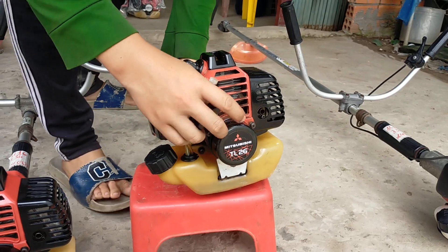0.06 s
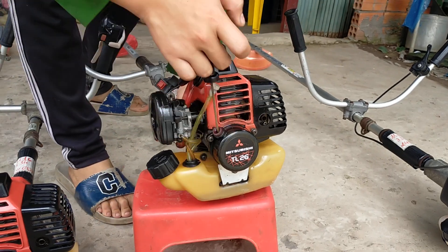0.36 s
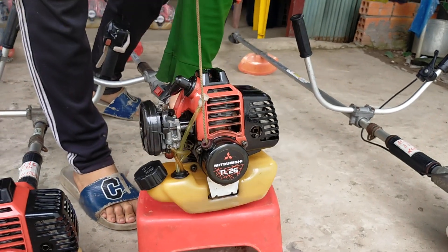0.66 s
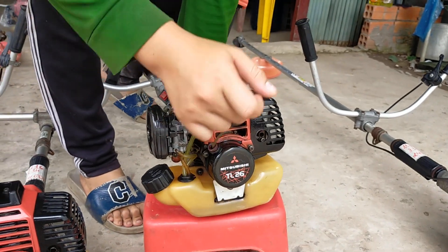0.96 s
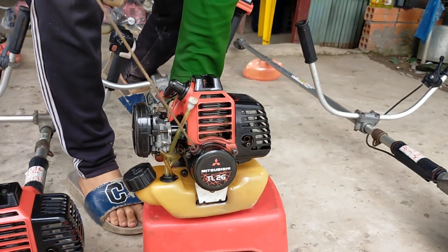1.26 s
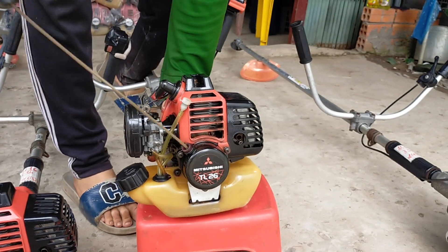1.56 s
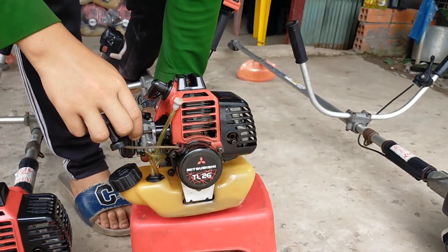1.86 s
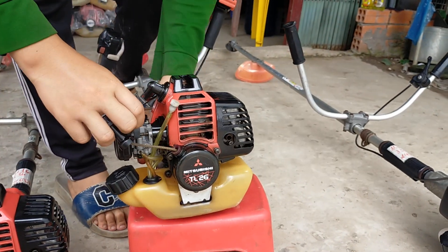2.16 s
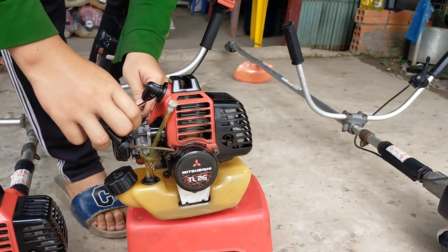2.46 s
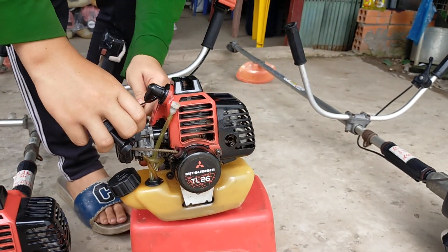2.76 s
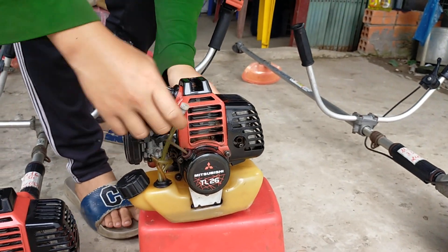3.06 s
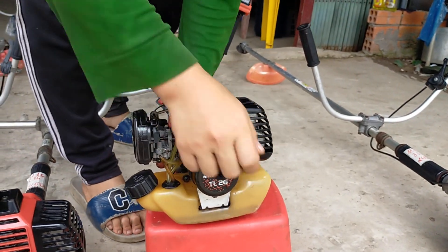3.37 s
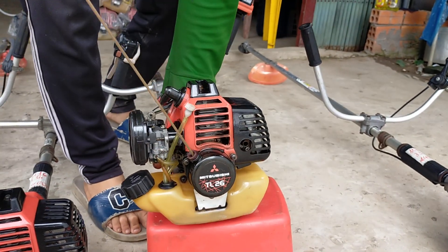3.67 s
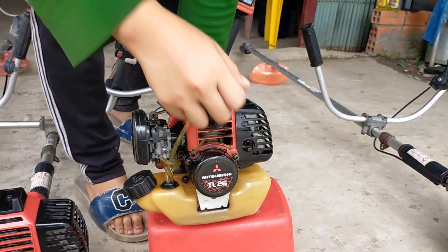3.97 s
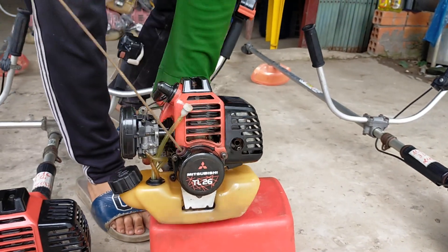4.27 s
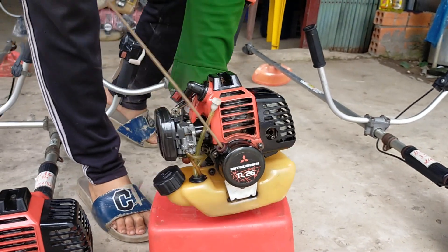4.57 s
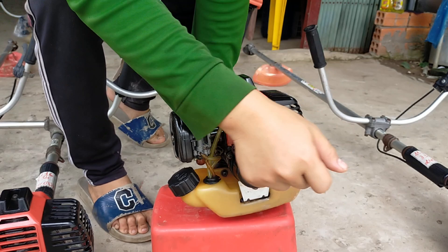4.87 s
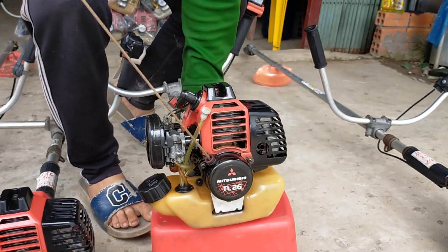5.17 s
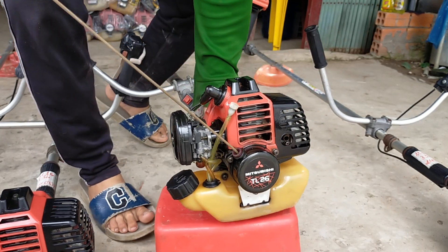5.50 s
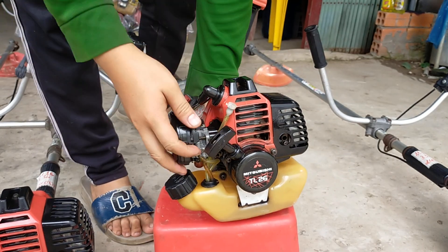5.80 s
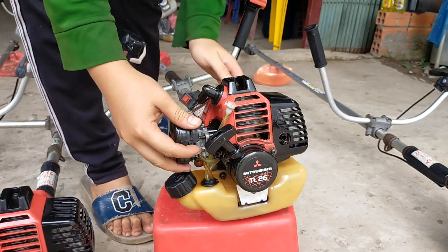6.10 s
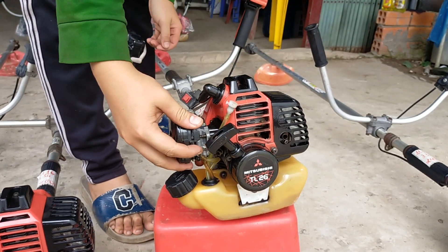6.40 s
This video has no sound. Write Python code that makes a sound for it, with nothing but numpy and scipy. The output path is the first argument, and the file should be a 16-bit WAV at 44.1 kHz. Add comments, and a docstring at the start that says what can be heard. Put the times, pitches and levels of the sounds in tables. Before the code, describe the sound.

In a yard, close to the microphone, a small two-stroke engine is cranked by repeated pulls of a hissing cord. Hollow chuffs alternate with ratcheting steel clinks, plastic clicks and light sleeve rustles, and a dull bump comes midway. On the last pull the engine fires and runs in a rough, clattering idle, with a short echo off the walls and a faint machine hum far away.

```python
"""A small two-stroke brush cutter, pull-started on a stool in a concrete yard, close to the microphone.
Its plastic parts click as it is handled. Each pull of the cord makes the piston churn and chuff,
and the pawl clinks over the steel starter cup as the cord winds back. On the last pull the engine
catches and idles unevenly: an exhaust pulse rings the muffler every turn, but only some turns fire hard.
Behind it lie a short echo off the shed walls, a soft outdoor wash and the hum of a far machine."""
import sys
import numpy as np
from scipy import signal
from scipy.fft import rfft, irfft
from scipy.io import wavfile

SR = 44100
rng = np.random.default_rng(int(sys.argv[2]) if len(sys.argv) > 2 else 0)


def put_to_file(sound):
    """Save the sound as 16-bit audio at rate SR, in the file named by the first command-line argument."""
    columns = np.atleast_2d(sound).T  # one column per channel
    safe = np.clip(columns, -1, 1)
    whole_steps = np.round(safe * 32767)
    wavfile.write(sys.argv[1], SR, whole_steps.astype(np.int16))


N = 284004
TIME = np.arange(N) / SR
CATCH_S = 5.17  # the engine comes to life

# The tone of each sound at the microphone. Each row: frequency in Hz, relative level in dB.
YARD_SPECTRUM = [(20, -3), (120, -8), (165, -12.5), (210, -14), (420, -18), (680, -12), (1300, -11),
                 (1800, -10.5), (2250, -17.5), (2800, -23.5), (6000, -29), (7800, -23), (9500, -33.5),
                 (15500, -31.5)]  # distant outdoor wash
SWISH_SPECTRUM = [(700, -8.5), (1500, 9), (2300, 9), (3200, -1), (5000, -14), (9000, -32)]  # sleeves and hands
SNAP_SPECTRUM = [(1200, -34), (2500, 4), (3600, 4.5), (5500, 0.5), (7700, 10.5), (9500, -4), (11500, 7),
                 (15500, -2.5)]  # plastic snapping
BODY_SPECTRUM = [(200, -37), (550, -16.5), (870, 1), (1020, 0.5), (1260, 5.5), (1650, -5), (1950, -5),
                 (2500, -12.5), (4000, -20)]  # the machine's hollow body
STRIKE_SPECTRUM = [(1500, -38), (2500, -15.5), (3200, 5.5), (4600, 5.5), (5500, 3.5), (7700, 10),
                   (9800, -2), (11000, 8.5), (12500, -2.5), (15500, 8)]  # pawl on steel
CORD_SPECTRUM = [(1200, -29), (2200, -5), (2700, 0.5), (3300, 1.5), (4800, 2), (6000, -3), (7800, 4.5),
                 (9500, -5.5), (11000, -2.5), (13000, -6), (15500, -2.5)]  # cord sliding out
CHURN_SPECTRUM = [(40, -7), (90, 10), (170, 3.5), (260, 4), (400, -3), (520, -1), (640, 3), (880, -4),
                  (1250, 4), (1650, -7.5), (1980, 1.5), (2600, -48), (4000, -18), (6600, -60)]  # air churned by the piston
PIPE_SPECTRUM = [(25, -32), (52, -6), (105, 3.5), (155, 4), (208, 0), (270, -1), (340, -8), (450, -9),
                 (800, 4), (2000, -58), (4000, -74)]  # exhaust pipe
MUFFLER_SPECTRUM = [(300, -23.5), (500, -8.5), (625, 9), (760, 6), (900, 6.5), (1020, -5.5), (1150, 4.5),
                    (1260, 1), (1420, 5.5), (1650, -25), (1950, -20), (2500, -34), (4000, -30)]  # muffler shell
THUMP_SPECTRUM = [(40, -20), (110, -10), (190, 24), (290, -1.5), (420, -22), (650, -20), (1000, -32),
                  (2000, -49)]  # low throb of the idle
RASP_SPECTRUM = [(150, -4), (450, -21), (640, -4), (800, -8), (1150, -5), (1400, 0.5), (1650, -19),
                 (1950, -5), (2500, -34), (4000, -47)]  # escaping gas
CLATTER_SPECTRUM = [(1200, 11.5), (2200, -1.5), (2700, 1.5), (4000, 3), (5200, 4.5), (6500, -3.5),
                    (7700, 7.5), (9000, -3.5), (11000, 2.5), (14000, -16), (15600, 6.5)]  # rattling metal, also the hiss of a rustle
TICK_SPECTRUM = [(3000, -4.5), (5500, -5), (6600, 2), (7800, 6), (9000, -14), (15000, -4)]  # piston and loose metal ticking
CRACK_SPECTRUM = [(1200, -42), (2500, -13), (4100, 3), (5200, -5), (6500, -0.5), (7700, 9), (9200, -6.5),
                  (11000, -3), (13000, -3.5), (14200, 4), (15600, 5)]  # a hard firing

# A machine humming far off. Each row: harmonic number, level in dB.
HUM_HARMONICS = [(1, -66), (2, -55.5), (3, -65), (4, -63), (7, -60.5), (9, -62), (17, -61)]
# Air stirred at the microphone by arms and engine.
# Each row: centre in seconds, half width in seconds, level in dB.
AIR_GUSTS = [(0.299, 0.098, -42), (1.68, 0.16, -39), (3.9, 0.14, -42), (4.7, 0.15, -47), (6.3, 0.42, -38)]
# Dull low thuds. Each row: start in seconds, level in dB, decay in seconds.
DULL_THUDS = [(0.305, -28, 0.004), (1.616, -27.5, 0.0096), (1.657, -29, 0.005), (1.736, -46, 0.011),
              (1.768, -40, 0.0047), (3.551, -15.5, 0.03), (3.654, -18, 0.27), (4.71, -29, 0.0067)]

# Ringing parts. Each row: frequency in Hz, relative level in dB, time to fall 60 dB in seconds.
CUP_MODES = [(3090, 6.5, 0.1), (3166, 8, 0.087), (4000, -10, 0.044), (4730, 0, 0.063), (7000, -3.5, 0.1),
             (7900, -3, 0.12), (8930, 1, 0.15), (9420, 7, 0.051), (10850, 2.5, 0.094), (13100, -12, 0.044),
             (14200, -2, 0.063)]  # steel starter cup
HOUSING_MODES = [(888, -1, 0.065), (1050, -7, 0.07), (1181, -2.5, 0.045), (1366, 1.5, 0.037),
                 (1924, 0.5, 0.06), (1993, 1, 0.051), (2150, -24, 0.033)]  # engine housing
# Handle, levers and housing clicking. Each row: start in seconds, relative snap and body levels in dB.
PLASTIC_CLICKS = [(0.3771, -22.5, -19.5), (0.6609, -42, -24.5), (0.6735, -27, -30.5), (1.0173, -25, -38),
                  (1.1759, -22, -38), (1.1872, -20.5, -17.5), (2.05, -28, -44), (2.1552, -20, -32.5),
                  (2.6662, -45, -36), (2.7364, -32.5, -39), (3.132, -65, -36.5), (3.5501, -20, -30),
                  (4.1882, -23.5, -50), (4.2007, -20.5, -17), (4.7947, -27.5, -38), (4.8328, -29, -32),
                  (5.0995, -16.5, -21), (5.134, -28.5, -43)]
# Sleeves and hands brushing the machine.
# Each row: start and length in seconds, swish and hiss levels in dB.
SLEEVE_RUSTLES = [(0.083, 0.075, -57, -39), (0.793, 0.16, -62, -45), (2.601, 0.052, -68, -41),
                  (2.931, 0.046, -36.5, -43), (3.025, 0.043, -45.5, -59), (3.316, 0.046, -34, -47)]
# Lone knocks of the pawl. Each row: start in seconds, relative ring and body levels in dB.
PAWL_CLINKS = [(0.955, -32.5, -42), (1.072, -36.5, -41), (1.4999, -40, -28.5), (1.7685, -22.5, -27),
               (3.29, -39.5, -31.5), (3.9212, -23, -30.5), (4.3672, -23.5, -34)]
# The pawl ratcheting as the cord winds back. Each row: start in seconds, number of teeth, first gap
# in seconds, ratio of each gap to the last, relative ring and body levels in dB, fade per tooth in dB.
PAWL_RATCHETS = [(1.414, 2, 0.022, 1, -15, -18.5, 3.5), (1.555, 8, 0.028, .995, -13, -20.5, 1.5),
                 (3.8017, 4, 0.02, 0.89, -16, -24, 2), (3.9649, 6, 0.022, 1.074, -14.5, -20, 2.5),
                 (4.4358, 3, 0.018, 1.1, -19, -20.5, 3.5), (4.569, 6, 0.022, 1.17, -14, -19, 3)]
# Pulls of the cord. Each row: first compression in seconds, number of compressions, their gap in
# seconds, moment of peak effort in seconds, relative churn, cord, chuff and thump levels in dB.
CORD_PULLS = [(0.674, 2, 0.029, .68, -31, -40.5, -34, -29.5),
              (1.297, 4, .031, 1.335, -21, -32.5, -13, -26.5),
              (3.649, 5, 0.032, 3.72, -27.5, -32, -11, -26.5),
              (4.293, 5, .0335, 4.34, -22.5, -33.5, -11.5, -25),
              (4.703, 3, .0255, 4.76, -30.5, -48, -16, -39), (5.187, 6, 0.023, 5.27, -31, -43, -15.5, -29)]
# Hollow coughs that stand out.
# Each row: start in seconds, relative chuff and thump levels in dB, thump pitch in Hz.
ENGINE_COUGHS = [(0.673, -30, -29.5, 582), (1.248, -14.5, -24.5, 700), (1.342, 0.5, -43, 202),
                 (4.317, -9.5, -28, 460), (4.367, -2.5, -31, 400), (4.755, -11.5, -24.5, 269),
                 (5.209, -11, -29.5, 166), (5.27, -13, -25, 484), (5.281, -28, -23.5, 610),
                 (5.305, -5.5, -27, 610), (5.405, -15, -22, 318), (5.813, -25, -24, 950)]

# The running crank. Each row: time in seconds, speed in turns per second.
CRANK_SPEED = [(5.16, 43.34), (5.26, 38.81), (5.33, 49.0), (5.41, 32.87), (5.47, 45.05), (5.54, 43.47),
               (5.66, 49.47), (5.85, 47.95), (5.93, 51.91), (6.2, 52.34), (6.44, 51.27)]
# The exhaust's low drone. Each row: multiple of the crank speed, settled level in dB.
DRONE_HARMONICS = [(1, -44), (2, -41), (3, -43), (4, -38), (5, -43), (6, -49)]
# Spells of hard firing; between them the engine misses. Each row: rough start in seconds, number of
# firings, spacing in turns, relative crack and body levels in dB, crack length in seconds.
FIRING_SPELLS = [(5.23, 1, 1, -24.5, -6, 0.0057), (5.347, 1, 1, -27, -18, 0.0058),
                 (5.427, 1, 1, -18, -24, .001), (5.475, 2, 3, -21, -24, .001),
                 (5.631, 6, 1, -23, -19, 0.0034), (5.794, 1, 1, -25.5, -39, .0017),
                 (5.814, 1, 1, -20.5, -15, 0.0019), (5.898, 3, 1, -23.5, -16, 0.0048),
                 (5.974, 2, 3, -23, -17, .005), (6.088, 4, 2, -22, -17, 0.0042),
                 (6.224, 2, 3, -21.5, -14, 0.005), (6.339, 2, 1, -29, -41, 0.0057),
                 (6.397, 2, 1, -23, -17.5, 0.0047)]


def amp(db):
    """Decibels to gain."""
    return 10 ** (np.asarray(db) / 20)


def unit(x):
    """Scales to rms 1."""
    return x / np.sqrt(np.mean(x ** 2) + 1e-20)


def gains(spectrum, size):
    """A spectrum as gains on the bins of an FFT."""
    hz, db = np.transpose(spectrum)
    return amp(np.interp(np.log(np.fft.rfftfreq(size, 1 / SR) + 1), np.log(hz), db))


def noise(spectrum, size=N):
    """Coloured noise of rms 1."""
    return unit(irfft(rfft(rng.standard_normal(size)) * gains(spectrum, size), size))


def impulse_response(spectrum, size=4096):
    """How a body with this spectrum answers one sharp push, with energy 1."""
    log_gain = np.log(gains(spectrum, size))
    mirrored = np.r_[log_gain, log_gain[-2:0:-1]]
    minimum_phase = np.exp(np.conj(signal.hilbert(mirrored)))
    response = np.fft.ifft(minimum_phase).real
    return response / np.linalg.norm(response)


def wander(rate_hz):
    """A random drift of rms 1, mostly slower than this rate."""
    rolloff = 1 + (np.fft.rfftfreq(N, 1 / SR) / rate_hz) ** 4
    return unit(irfft(rfft(rng.standard_normal(N)) / rolloff, N))


def add(mix, start_s, sound):
    """Mixes a sound in at a time."""
    part = mix[max(round(start_s * SR), 0):][:len(sound)]
    part += sound[:len(part)]


def burst(spectrum, rise, hold, decay, size=4096):
    """A puff of noise that swells, holds and dies; times in seconds."""
    t = TIME[:size]
    return noise(spectrum, size) * np.minimum(t / rise, 1) * np.exp(-np.maximum(t - hold, 0) / decay)


def ring(modes, spread_db, detune=0.0017, size=7000):
    """Dying modes; each blow weights and detunes them anew, and loose contact blurs their pitch."""
    hz, db, t60 = np.transpose(modes)[:, :, None]
    t = TIME[:size]
    level_draw, pitch_draw = rng.standard_normal((2, len(modes), 1))
    weight = amp(db + spread_db * level_draw)
    blur = 0.008 * np.cumsum(rng.standard_normal((len(modes), size)), axis=1)
    cycles = hz * (1 + detune * pitch_draw) * t + blur + rng.random(hz.shape)
    waves = weight * amp(-60 * t / t60) * np.sin(2 * np.pi * cycles)
    return waves.sum(0) / np.linalg.norm(weight) * np.minimum(t / 0.0023, 1)


def yard(wash_db=-45, still_air_db=-54, hum_hz=81.5):
    """Far off, an outdoor wash and a wavering hum; at the microphone, the rumble of stirred air."""
    swell = amp(0.8 * wander(5))
    wash = amp(wash_db) * noise(YARD_SPECTRUM) * swell
    gusts = sum(amp(db) * np.exp(-((TIME - centre) / width) ** 2) for centre, width, db in AIR_GUSTS)
    air = noise([(15, -1), (35, -7.5), (90, -8.5), (200, -27.5), (600, -67)])
    rumble = (amp(still_air_db) + gusts) * air * amp(2 * wander(13))
    phase = 2 * np.pi * np.cumsum(hum_hz * (1 + 0.00397 * wander(3.54))) / SR
    hum = sum(amp(db + 2 * wander(0.57)) * np.sin(round(k) * phase) for k, db in HUM_HARMONICS)
    return wash + rumble + hum


def wall_echoes(sound, t60=0.3, echoes_per_s=3000):
    """The concrete floor and the shed walls scatter a thin, short tail back to the microphone."""
    t = TIME[:SR // 2]
    taps = rng.standard_normal(len(t)) * (rng.random(len(t)) < echoes_per_s / SR)
    taps *= (t > 0.005) * amp(-60 * t / t60)
    colour = gains([(100, 8.5), (1000, -0.5), (4000, 5), (8000, 0), (15000, 1)], len(t))
    tail = irfft(rfft(taps / np.linalg.norm(taps)) * colour, len(t))
    return amp(-15) * signal.oaconvolve(sound, tail)[:N]


def dull_thuds(rise_s=0.00035):
    """Dull low thuds: the cord handle bumping, and a bump at the microphone."""
    out, t = np.zeros(N), TIME[:SR]
    for start, db, decay in DULL_THUDS:
        add(out, start, amp(db) * (1 - np.exp(-t / rise_s)) * np.exp(-t / decay))
    return out


def handling():
    """Close by, plastic snaps, the housing answers and the cup rings faintly; sleeves brush past."""
    out = np.zeros(N)
    for start, snap_db, body_db in PLASTIC_CLICKS:
        add(out, start, amp(snap_db + 2) * burst(SNAP_SPECTRUM, rise=0.0008, hold=0.0017, decay=0.0017))
        add(out, start, amp(snap_db - 15) * ring(CUP_MODES, spread_db=5))
        knock = burst(BODY_SPECTRUM, rise=0.00027, hold=0.00095, decay=0.0065)
        add(out, start, amp(body_db - 0.5) * knock)
        add(out, start, amp(body_db + 3) * ring(HOUSING_MODES, spread_db=3.5))
    for start, length, swish_db, hiss_db in SLEEVE_RUSTLES:
        half = length / 2
        for spectrum, db in (SWISH_SPECTRUM, swish_db), (CLATTER_SPECTRUM, hiss_db):
            add(out, start, amp(db) * burst(spectrum, rise=half, hold=half, decay=half, size=16384))
    return out


def clink(ring_db, body_db):
    """The pawl strikes and chatters on the steel cup, which rings and shakes the housing."""
    out = amp(ring_db + 0.5) * ring(CUP_MODES, spread_db=9, detune=0.0052)
    add(out, 0, amp(ring_db + 1) * burst(STRIKE_SPECTRUM, rise=0.0009, hold=0.00067, decay=0.0037))
    rebound_s = rng.uniform(0.006, 0.016)
    chatter = burst(STRIKE_SPECTRUM, rise=0.0019, hold=0.0011, decay=0.0097)
    add(out, rebound_s, amp(ring_db - 14.5) * chatter)
    add(out, 0, amp(body_db - 2.5) * burst(BODY_SPECTRUM, rise=0.0056, hold=0.0072, decay=0.0065))
    return out + amp(body_db + 4.5) * ring(HOUSING_MODES, spread_db=9.5, detune=0.0051)


def starter_pawl(graze_s=0.02):
    """The pawl knocks alone, or runs over the teeth ever softer as the cord winds back."""
    out = np.zeros(N)
    for start, ring_db, body_db in PAWL_CLINKS:
        add(out, start, clink(ring_db, body_db))
    for start, teeth, gap, gap_ratio, ring_db, body_db, fade_db in PAWL_RATCHETS:
        add(out, start - graze_s, amp(-14.5) * clink(ring_db, body_db + 2))  # a graze before it bites
        for tooth in range(round(teeth)):
            add(out, start, amp(-fade_db * tooth) * clink(ring_db, body_db))
            start += gap * gap_ratio ** tooth
    return out


def chuff(chuff_db, thump_db, thump_hz, thump_s=0.0029):
    """A puff of air, and a hollow pop of a few cycles from the crankcase."""
    t = TIME[:4096]
    puff = burst(BODY_SPECTRUM, rise=0.00081, hold=0.0043, decay=0.007)
    pop = t / thump_s * np.exp(1 - t / thump_s) * np.sin(2 * np.pi * thump_hz * t)
    return amp(chuff_db - 14.5) * puff + amp(thump_db + 4.5) * pop


def cranking(crankcase_hz=195, tighten_s=0.027, slack_s=0.022, coast_s=0.055, effort_db_per_s=64):
    """The cord hisses out while the piston churns air, chuffs at each compression and at times coughs."""
    out, churn_level, cord_level = np.zeros((3, N))
    for first, compressions, gap, peak, churn_db, cord_db, chuff_db, thump_db in CORD_PULLS:
        times = first + gap * np.arange(round(compressions))
        before, after = np.maximum(first - TIME, 0), np.maximum(TIME - times[-1], 0)
        effort = amp(-effort_db_per_s * abs(TIME - peak)) * np.exp(-after / coast_s)
        chug = 1 + 0.28 * np.cos(2 * np.pi * (TIME - first - 0.005) / gap)
        churn_level += amp(churn_db - 3.5) * effort * np.exp(-before / tighten_s) * chug
        cord_level += amp(cord_db + 3) * effort * np.exp(-before / slack_s)
        for start in times:
            thump_hz = crankcase_hz * np.exp(0.16 * rng.standard_normal())
            add(out, start, effort[round(start * SR)] * chuff(chuff_db, thump_db, thump_hz))
    for start, *cough in ENGINE_COUGHS:
        add(out, start, chuff(*cough))
    out += churn_level * noise(CHURN_SPECTRUM) * amp(2.5 * wander(90))
    scrape = unit(amp(5 * wander(170)))
    return out + cord_level * noise(CORD_SPECTRUM) * scrape


def crank_turns():
    """Turns of the crank since the engine caught."""
    return np.cumsum(np.interp(TIME, *np.transpose(CRANK_SPEED), left=0)) / SR


def firing_events():
    """Yields each hard firing, on a whole turn of the crank: start, crack and body levels, length."""
    turns = crank_turns()
    for start, count, spacing, *sound in FIRING_SPELLS:
        first_turn = round(turns[round(start * SR)])
        for k in range(round(count)):
            yield np.searchsorted(turns, first_turn + k * round(spacing)) / SR, *sound


def exhaust_drone(settle_s=0.98):
    """The low harmonics of the exhaust pulses follow the crank and build as the idle steadies."""
    phase = 2 * np.pi * crank_turns()
    settled = np.clip((TIME - CATCH_S) / settle_s, 0, 1)
    return settled * sum(amp(db + 1.5 * wander(10)) * np.cos(round(k) * phase)
                         for k, db in DRONE_HARMONICS)


def engine_idle(rise_s=0.038, flare_db=3, flare_s=0.34, shake_s=0.019):
    """One exhaust pulse a turn rings the muffler; gas rasp and metal clatter follow the crank angle."""
    turns, age = crank_turns(), np.maximum(TIME - CATCH_S, 0)
    flare = amp(flare_db * np.exp(-(age / flare_s) ** 2))  # the first turns are louder
    running = np.minimum(age / rise_s, 1) * flare
    exhaust_level, clatter_level = amp(-34) * running, amp(-30) * running
    for start, *_ in firing_events():  # each hard firing shakes more clatter loose
        add(clatter_level, start, amp(-32.5) * np.exp(-TIME[:SR // 2] / shake_s))
    mean_speed = np.mean(CRANK_SPEED, axis=0)[1]
    pulses = np.diff(np.floor(turns), prepend=0) * np.sqrt(SR / mean_speed)
    charge, slack = rng.standard_normal((200, 2))[turns.astype(int)].T  # no two turns are alike
    strength = amp(1.3 * charge)

    def once_a_turn(at, sharpness):
        """A smooth bump at this share of each turn."""
        return np.exp(sharpness * (np.cos(2 * np.pi * (turns - at)) - 1))

    pipe_and_muffler = amp(-4.5) * impulse_response(PIPE_SPECTRUM) + impulse_response(MUFFLER_SPECTRUM)
    putter = signal.oaconvolve(pulses * strength, pipe_and_muffler)[:N]
    throb = amp(-13) * noise(THUMP_SPECTRUM)
    gas_flow = 0.15 + 1.15 * once_a_turn(0.08, 5) + 0.2 * once_a_turn(0.55, 6)
    rasp = strength * gas_flow * noise(RASP_SPECTRUM)
    shaking = (0.35 + 0.7 * once_a_turn(-0.04, 2)) * amp(2.5 * wander(200))
    rattle = amp(2) * shaking * noise(CLATTER_SPECTRUM)
    # the piston ticks against the bore half a turn after the pulse
    slap = amp(4 * slack - 1.5) * once_a_turn(0.47, 14) * noise(TICK_SPECTRUM)
    return exhaust_level * (putter + throb + rasp) + clatter_level * (rattle + slap)


def hard_firings(bark_lead_s=0.001563, rebound_s=0.011):
    """A hard firing cracks and barks from the muffler; loose metal rebounds about half a turn later."""
    out = np.zeros(N)
    for start, crack_db, body_db, length in firing_events():
        crack = burst(CRACK_SPECTRUM, rise=0.00017, hold=length, decay=0.0026)
        bark = burst(BODY_SPECTRUM, rise=0.00066, hold=0.0054, decay=0.0088)
        tick = burst(TICK_SPECTRUM, rise=0.0013, hold=0.00039, decay=0.0017)
        add(out, start - length / 2, amp(crack_db + 6) * crack)
        add(out, start - bark_lead_s, amp(body_db - 11) * bark)
        add(out, start + rebound_s, amp(crack_db + 2) * tick)
    return out


def scene():
    """One microphone close to the brush cutter, with the echoes and the yard behind."""
    cutter = starter_pawl() + handling() + cranking() + engine_idle() + exhaust_drone() + hard_firings()
    return (cutter + wall_echoes(cutter) + dull_thuds() + yard())[None]


def record(dry, cutoff_hz=15900):
    """The recorder cuts off the highest treble."""
    lowpass = signal.firwin(401, cutoff_hz, window=("kaiser", 8), fs=SR)
    return signal.oaconvolve(dry, lowpass[None], "same")


dry = scene()
out = record(dry)
put_to_file(out)
```